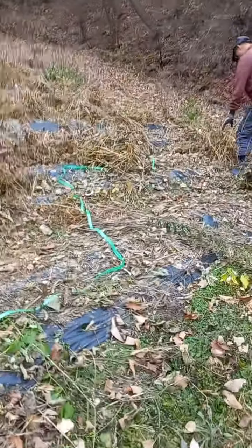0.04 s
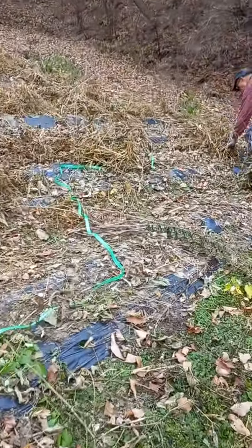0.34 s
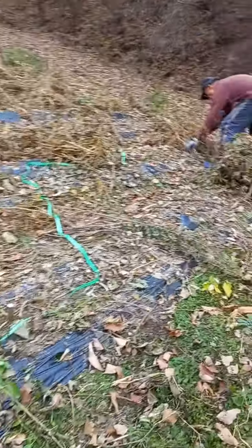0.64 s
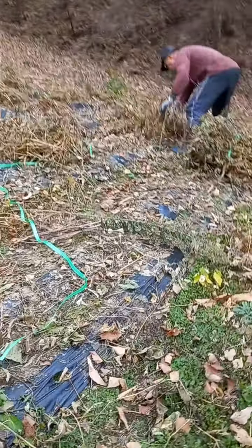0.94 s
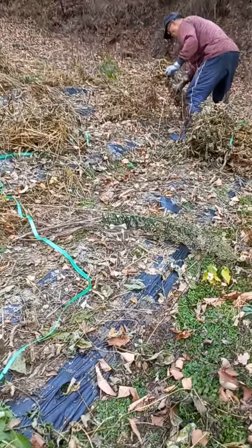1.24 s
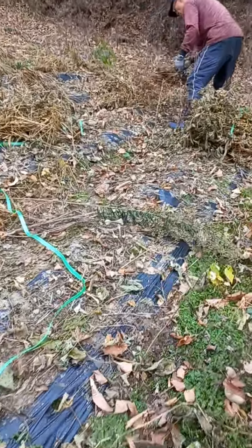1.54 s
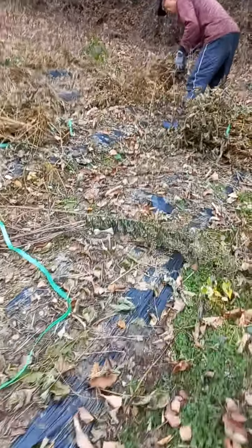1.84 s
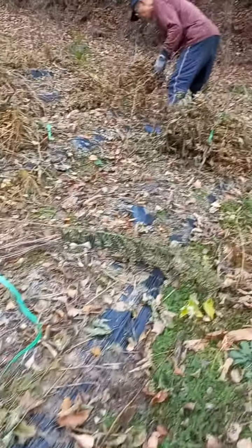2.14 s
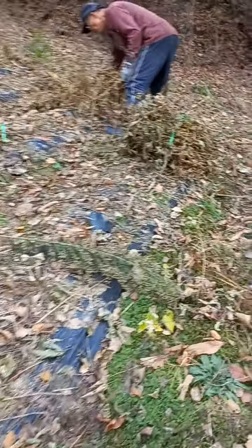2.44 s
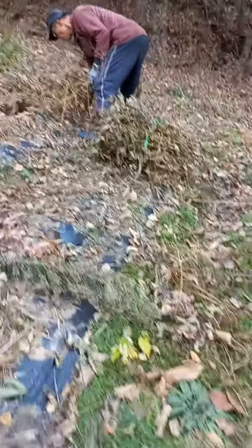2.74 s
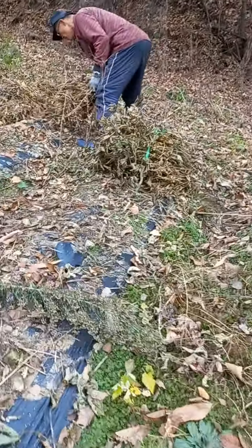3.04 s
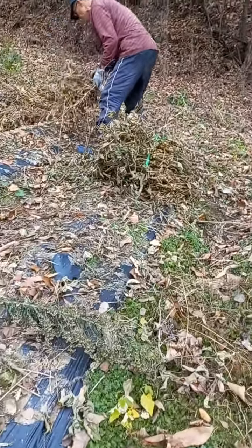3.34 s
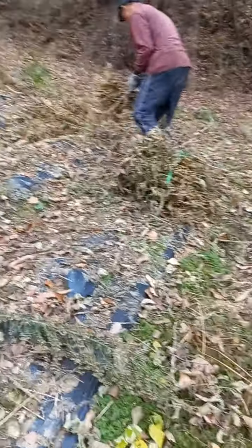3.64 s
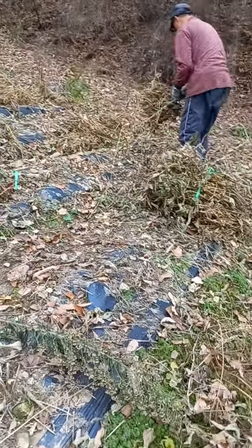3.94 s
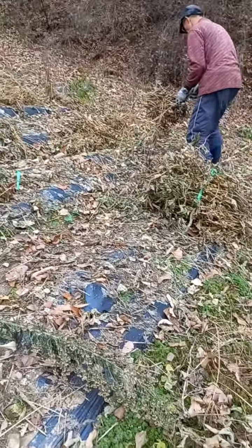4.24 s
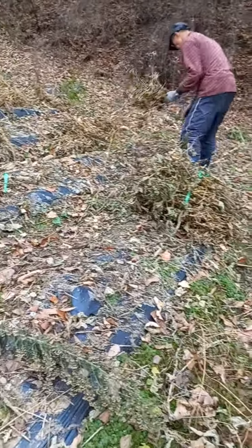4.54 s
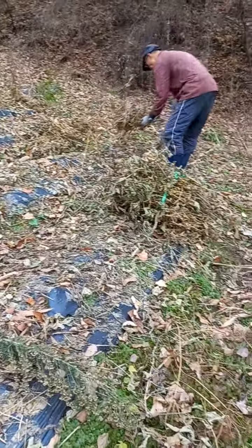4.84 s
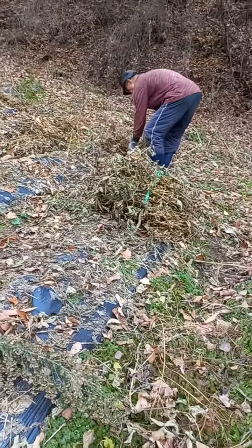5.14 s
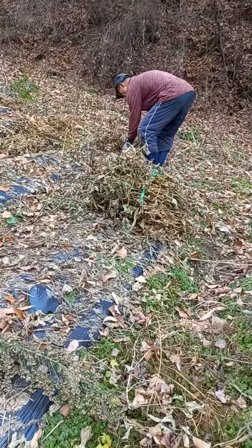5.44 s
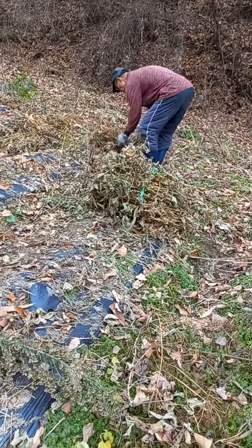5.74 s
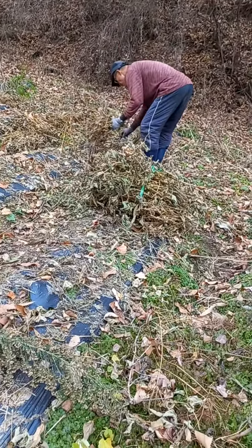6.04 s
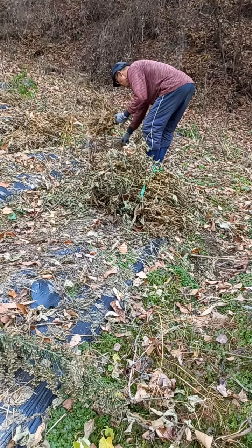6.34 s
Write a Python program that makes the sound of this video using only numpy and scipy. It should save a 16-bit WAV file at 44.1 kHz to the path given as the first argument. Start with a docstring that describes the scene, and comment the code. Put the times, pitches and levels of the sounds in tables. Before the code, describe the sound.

Slow steps crackle through dry leaves and twigs nearby, with swells of papery rustling from stalks being gathered further off.

```python
"""Gathering dry bean stalks

Stalks are gathered by hand a few metres away in an open field: swells of fine, papery crackle.
Close below the phone, slow steps crush leaf litter, snap twigs, pop hollow stems and thud on soft soil.
A sleeve brushes now and then; two microphone ports hear each source with their own lag and colour."""
import sys
import numpy as np
from scipy import signal
from scipy.fft import rfft, irfft, next_fast_len
from scipy.io import wavfile
from scipy.ndimage import uniform_filter1d

SR = 44100
rng = np.random.default_rng(int(sys.argv[2]) if len(sys.argv) > 2 else 0)


def waveform_to_disk(signal):
    """Save audio, clipped to [-1, 1], as 16-bit WAV at the path in sys.argv[1]."""
    frames = np.transpose(np.atleast_2d(signal))
    scaled = np.clip(frames, -1, 1) * 32767
    samples = np.round(scaled).astype(np.int16)
    wavfile.write(sys.argv[1], SR, samples)


N = 290619
TIME = np.arange(N) / SR


def undb(db):
    """Decibels to gain."""
    return 10 ** (np.asarray(db) / 20)


def unit(x):
    """Scale to rms 1."""
    return x / np.sqrt(np.mean(x ** 2))


def colour(x, points):
    """Minimum-phase filter through (freq_hz, gain_db) points."""
    hz, db = np.transpose(points)
    grid_hz = np.maximum(np.fft.rfftfreq(4096, 1 / SR), 1)
    gain = undb(np.interp(np.log(grid_hz), np.log(hz), db))
    cepstrum = irfft(np.log(gain))
    half = len(cepstrum) // 2
    cepstrum[1:half] *= 2
    cepstrum[half + 1:] = 0
    response = irfft(np.exp(rfft(cepstrum)))
    return signal.fftconvolve(x, np.atleast_2d(response), axes=-1)[:, :x.shape[-1]]


def ports(x, lead_ms):
    """One sound at two ports; the left hears it lead_ms earlier."""
    size = next_fast_len(len(x) + 128)
    phase = np.pi * np.fft.rfftfreq(size, 1 / SR) * lead_ms / 1000
    return irfft(rfft(x, size) * np.exp(1j * np.array([phase, -phase])), size)[:, :len(x)]


def pan(db):
    """Port gains for a left minus right level."""
    return undb(np.array([[.5], [-.5]]) * db)


def add(out, start_s, sound):
    """Mix in a short stereo sound."""
    start = max(int(start_s * SR), 0)
    out[:, start:start + sound.shape[1]] += sound[:, :N - start]


def wander(step_s, size=N):
    """Random levels step_s apart, joined by straight lines."""
    levels = rng.standard_normal(4096)
    return np.interp(TIME[:size] / step_s, np.arange(len(levels)), levels)


def swell(start_s, hold_s, db, rise_db_per_s, fall_db_per_s):
    """Gain of one movement: reaches its level at start_s, holds, dies away."""
    early_s = np.maximum(start_s - TIME, 0)
    late_s = np.maximum(TIME - start_s - hold_s, 0)
    return undb(np.maximum(db - rise_db_per_s * early_s - fall_db_per_s * late_s, -200))


def together(gains):
    """Unrelated rustles add in power."""
    return np.sqrt(sum(gain ** 2 for gain in gains))


def scatter(x, t60_s, wet_db):
    """Ground and plants throw back a short tail, unrelated at the two ports."""
    t = TIME[:min(SR // 8, x.shape[1])]
    tail = rng.standard_normal((2, len(t))) * np.exp(-np.log(1000) * t / t60_s)
    tail /= np.sqrt(np.sum(tail ** 2, axis=1, keepdims=True))
    return x + undb(wet_db) * signal.fftconvolve(x, tail, axes=-1)[:, :x.shape[1]]


def shade(x):
    """The phone's body dulls the left port for sounds from below."""
    left = colour(x[:1], [(1500, 0), (4000, 3), (7000, -7.5), (11000, -.5), (15000, -5)])
    return np.vstack([left, x[1:]])


def crackle(rate_per_s, spread_db, clump_db, lead_ms, width_ms, wet_db, families=14):
    """Tiny fractures in clumps; each leaf family has a pitch, and a path that shifts as plants move."""
    ring_s, share_db, path_s = .00025, 2.3, .55
    clumps_db = clump_db * wander(step_s=.012)
    out, t, path_samples = np.zeros((2, N)), TIME[:SR // 40], int(path_s * SR)
    for hz in np.linspace(900, 15500, families):
        breaks = np.flatnonzero(rng.random(N) < rate_per_s / families / SR)
        size_db = spread_db * np.minimum(rng.exponential(size=N)[breaks], 4.5)
        family_db = share_db * wander(step_s=.07)[breaks]
        polarity = np.sign(rng.random(N)[breaks] - .5)
        clicks = np.zeros((1, N))
        clicks[0, breaks] = undb(size_db + clumps_db[breaks] + family_db) * polarity
        leaf = np.exp(-t / ring_s) * np.cos(2 * np.pi * hz * t)
        leaf[0] += 1  # bare tick of the break
        direct = ports(np.roll(leaf, SR // 2000), lead_ms + width_ms * rng.uniform(-1, 1))
        for start in range(0, N, path_samples):
            path = scatter(direct, t60_s=.035, wet_db=wet_db)
            add(out, start / SR, signal.fftconvolve(clicks[:, start:start + path_samples], path, axes=-1))
    return unit(out)


def knocks(rows, lead_ms):
    """Heavily damped blows: a few cycles that swell and die."""
    out, t = np.zeros((2, N)), TIME[:SR // 10]
    for start_s, hz, level_db, swell_s in rows:
        envelope = (t / swell_s) ** 2 * np.exp(-1.4 * t / swell_s)
        blow = envelope / envelope.max() * np.sin(2 * np.pi * hz * t)
        add(out, start_s, ports(blow * undb(level_db), lead_ms))
    return out


# open-air spectrum: freq_hz, gain_db
AIR_SPECTRUM = [(25, -27), (45, -25), (70, -0.5), (110, -2), (170, -3), (300, -4), (750, -15), (1100, -23),
                (2000, -40.5), (6000, -17.5), (16000, -26.5)]


def air(level_db=-70):
    """Faint open-air noise, part common to both ports, part separate."""
    common = colour(rng.standard_normal((1, N)), AIR_SPECTRUM)
    separate = colour(rng.standard_normal((2, N)), AIR_SPECTRUM)
    separate = colour(separate, [(100, 6), (400, -1), (1200, 13)])
    return unit(common + separate) * undb(level_db) * pan(3.8)


def handful(start_s, hold_s, db, rise_db_per_s=149.5):
    """Gain of a pull on the stalks, then of their faint rustle as they spring back."""
    pull = swell(start_s, hold_s, db, rise_db_per_s, fall_db_per_s=139)
    spring_back = swell(start_s, hold_s, db - 13.5, rise_db_per_s, fall_db_per_s=20)
    return np.maximum(pull, spring_back)


# dry stalk spectrum; bending round the phone to the right port: freq_hz, gain_db
STALK_SPECTRUM = [(100, -13.5), (350, -12), (770, -7.5), (1050, -16), (1350, -10.5), (1750, -7.5),
                  (2300, -3.5), (3200, -4), (4000, 0), (5000, 0.5), (7200, 2.5), (8500, -3.5), (12000, -2),
                  (16000, -4.5)]
RIGHT_DIFFRACTION = [(800, 0), (1300, -3), (1850, -5.5), (2400, 2.5), (2850, -3), (3500, -0.5),
                     (4400, -1.5), (5800, 1.5), (6500, 2.5), (7500, -0.5), (16000, 0)]
# handfuls pulled into the bundle: start_s, hold_s, level_db, pan_db, sheen_db
HANDFULS = [(0, .01, -68, -7, 1), (0.092, 0.14, -64, -5.5, -1.5), (0.45, 0.19, -59.5, -2.5, 3),
            (0.655, 0.32, -50.5, -2, 2.5), (1.011, 0.084, -45, 4.5, 0), (1.142, 0.085, -54.5, 2, -2),
            (1.335, .02, -55.5, 0, -3), (2.035, 0.075, -56, 2.5, 0), (2.264, 0.051, -56.5, 1.5, -5),
            (2.412, 0.029, -54, -2.5, 1), (2.568, 0.081, -55, -3, -1.5), (2.811, 0.04, -42, 3, 1.5),
            (3.123, 0.027, -52, 2, 1.5), (3.292, .05, -57, 1, 0), (3.433, 0.033, -46.5, 3, 2.5),
            (3.592, 0.21, -53, -0.5, 3.5), (3.977, 0.035, -48, 0, -1.5), (4.174, 0.043, -45, 1.5, 1.5),
            (4.433, 0.11, -65, -1, -10), (4.59, 0.16, -58, 3, -1), (4.839, 0.037, -55.5, 3.5, 1),
            (5.086, 0.03, -51.5, 4, 0.5), (5.176, 0.05, -58.5, 4.5, -2), (5.46, 0.015, -66, 3, 5.5),
            (5.586, 0.13, -57.5, 4, -2), (5.75, 0.22, -54.5, 3, -0.5), (6.29, 0.026, -63, 3, 0.5),
            (6.435, 0.16, -62.5, 4, 2.5)]


def stalks(sheen_hz=8900):
    """Harder pulls break more leaves; leafy handfuls shine, single pods tick above the rustle."""
    stem_gain = together(handful(start_s, hold_s, db) * pan(pan_db)
                         for start_s, hold_s, db, pan_db, _ in HANDFULS)
    blade_gain = together(handful(start_s, hold_s, db + sheen_db) * pan(pan_db)
                          for start_s, hold_s, db, pan_db, sheen_db in HANDFULS)
    pull_db = 20 * np.log10(stem_gain.mean(axis=0))
    rate_per_s = 7500 * undb(.44 * (pull_db + 53.5))
    leaves = crackle(rate_per_s, spread_db=3, clump_db=1.8, lead_ms=.135, width_ms=.034, wet_db=1)
    leaves = unit(leaves / np.sqrt(rate_per_s))  # rate sets density only
    pods = crackle(rate_per_s=70, spread_db=1, clump_db=1, lead_ms=.135, width_ms=.044, wet_db=11)
    left, right = colour(leaves + undb(-14.5) * pods, STALK_SPECTRUM)
    rustle = unit(np.vstack([left, colour(right[None], RIGHT_DIFFRACTION)]))
    stems = signal.sosfiltfilt(signal.butter(3, sheen_hz, fs=SR, output="sos"), rustle)
    blades = rustle - stems
    return (stems * stem_gain + blades * blade_gain) * undb(1)


# reflection against direct sound: time_s, level_db
REFLECTION = [(2.5, -18), (3.0, -8.5), (6.5, -8.5)]


def bounce(x, lags_s=(.00178, .001)):
    """A near reflection ripples the timbre; it grows as the phone turns towards the bundle."""
    echo = np.array([np.roll(port, round(lag_s * SR)) for port, lag_s in zip(x, lags_s)])
    gain = undb(np.interp(TIME, *np.transpose(REFLECTION)))
    return (x + gain * echo) / np.hypot(1, gain)


def underfoot_grains():
    """Dense, even crackle under a shoe; it reaches the lower, right port first."""
    return crackle(rate_per_s=4000, spread_db=3, clump_db=.4, lead_ms=-.47, width_ms=.017, wet_db=-5)


# spectra of crisp leaves and the damp layer beneath: freq_hz, gain_db
CRISP_SPECTRUM = [(80, -13), (250, -9.5), (700, -14.5), (1000, -14), (1400, -5.5), (2100, -2.5), (3500, -3),
                  (5800, 3.5), (7200, 3), (8500, -1.5), (12000, -1.5), (16000, -2.5)]
DAMP_SPECTRUM = [(80, -15), (300, -8.5), (650, 1.5), (1300, 3.5), (2500, -2.5), (5000, -39)]
# shoe bearing down on litter: start_s, hold_s, crisp_db, damp_db
TREADS = [(0, 0.026, -54, -59.5), (0.295, 0.0083, -53, -55.5), (0.603, 0.54, -53.5, -66.5),
          (1.392, 0.036, -33.5, -58.5), (1.439, 0.015, -30.5, -55), (1.506, 0.017, -39.5, -50),
          (1.546, 0.04, -39, -57), (1.598, 0.04, -34, -52), (1.679, 0.16, -47.5, -71),
          (1.896, 0.072, -50, -91), (2.109, 0.021, -49.5, -63.5), (2.69, 0.077, -49, -55),
          (2.797, 0.079, -61, -55), (2.932, .1, -48.5, -60), (3.437, 0.17, -59, -63),
          (3.582, 0.11, -51, -57), (3.742, 0.041, -71, -53.5)]


def litter():
    """A shoe crushes crisp leaves and presses the damp layer beneath."""
    slopes = dict(rise_db_per_s=689, fall_db_per_s=278)
    crisp = crackle(rate_per_s=4000, spread_db=3, clump_db=1.9, lead_ms=-.444, width_ms=.062, wet_db=-6.5)
    crisp = unit(colour(crisp, CRISP_SPECTRUM))
    damp = unit(colour(underfoot_grains(), DAMP_SPECTRUM))
    crisp_gain = together(swell(start_s, hold_s, db, **slopes) for start_s, hold_s, db, _ in TREADS)
    damp_gain = together(swell(start_s, hold_s, db, **slopes) for start_s, hold_s, _, db in TREADS)
    return shade(crisp * crisp_gain + damp * damp_gain)


# dry fracture spectrum, leaves and twigs alike: freq_hz, gain_db
FRACTURE_SPECTRUM = [(300, -18), (1500, -12.5), (3500, -12.5), (6500, 3), (8500, -2), (12000, -0.5),
                     (16000, 1)]
# weight shifts on trodden leaves: start_s, hold_s, level_db
WEIGHT_SHIFTS = [(0, 0.057, -60), (0.634, 0.26, -50.5), (1.655, 0.28, -52.5), (3.38, 0.42, -53.5)]


def settling():
    """Trodden leaves give lone, crisp ticks as the weight shifts."""
    splits = crackle(rate_per_s=150, spread_db=-2, clump_db=-1, lead_ms=-.462, width_ms=.0081, wet_db=-2.5)
    weight = together(swell(*row, rise_db_per_s=62, fall_db_per_s=24) for row in WEIGHT_SHIFTS)
    return shade(unit(colour(splits, FRACTURE_SPECTRUM))) * weight * pan(3.8)


# brittle leaves splitting: start_s, pitch_hz, level_db
LEAF_TICKS = [(.0125, 8500, -40), (.2705, 10000, -45), (.533, 10000, -36), (.5605, 10500, -38),
              (.5843, 9600, -31.5), (.6575, 11000, -27), (.6604, 11100, -25), (.663, 11500, -24),
              (.7025, 11800, -21), (.7688, 10500, -31), (.8147, 10400, -29), (.8415, 10700, -26),
              (.8712, 11400, -24), (.8965, 11500, -25), (1.6955, 11800, -20), (1.7438, 10000, -32),
              (1.773, 10800, -29.5), (1.7925, 11000, -31), (2.006, 8000, -34), (2.0465, 10500, -30),
              (2.4355, 11000, -35), (2.506, 10500, -42), (2.5106, 10000, -30), (2.638, 11500, -27),
              (2.8845, 11000, -30), (3.072, 8000, -38), (3.5275, 11000, -32), (3.6805, 10500, -30),
              (3.7058, 10500, -33), (3.8428, 10500, -38)]


def leaf_ticks(swell_s=.00005):
    """A brittle leaf splits in a fraction of a millisecond, close below the right port."""
    splits = knocks([(*row, swell_s) for row in LEAF_TICKS], lead_ms=-.44)
    return scatter(splits * pan(-13), t60_s=.012, wet_db=-1)


# twigs and pods breaking: start_s, level_db, t60_s, woody_db, pan_db, treble_db
TWIG_SNAPS = [(.1172, -31.5, 0.0053, -23, -10, 3.5), (0.6206, -31, .009, -33, -14, -1),
              (0.6372, -27.5, .011, -44, -12.5, 0), (0.9296, -27, .007, -17, -6, -2),
              (1.3531, -16, .02, -9.5, 0, -6.5), (1.358, -24, .022, -16, 2, -9),
              (1.386, -28, .05, -14, -4, -7), (1.3895, -23, .05, -16, -2, -8),
              (1.4414, -10, .014, -15, -4, -12), (1.4448, -18.5, 0.013, -24, -6, -8),
              (1.4479, -17, .02, -20, -3, -14), (1.4526, -21, .05, -12, -6, -8),
              (1.514, -20, .014, -17, -1, 1.5), (1.5488, -24, .007, -22, 0, 2),
              (1.6488, -15.5, .007, -34, -5, -1), (1.7216, -27, .007, -27, -5, 0),
              (1.8272, -28.5, .01, 0, -2, -3), (2.2207, -42.5, .012, -5, 1, -3),
              (2.2885, -38.5, 0.058, -16, -2, -1), (2.356, -37.5, .013, -17, -5, -4.5),
              (2.535, -34, .008, -35, -11, -3), (2.5611, -30.5, .009, -29, -15, 7),
              (2.577, -37.5, .02, -22, -5, -4), (2.6776, -31.5, .014, -9, 3, -2),
              (2.6798, -28.5, .007, -23, -8, 2), (2.7, -25.5, .007, 17, 6, 2),
              (2.8734, -31.5, .01, -29, -12, -1), (2.927, -33, .011, 6, -3, -2),
              (3.561, -32, .04, -30, 3, 0), (3.939, -37, .02, -26, 2, -4), (4.1437, -31, 0.018, -21, 6, -3),
              (4.154, -33.5, .011, -23, 2, 0), (4.2385, -32, 0.011, -36, -3, -1),
              (4.382, -43.5, .02, -42, -4, -2), (4.6918, -35.5, .02, -36, 4, 0),
              (5.034, -40, .019, -47, 0, -1), (5.465, -50, .014, -31, 7, -8),
              (5.5135, -42, 0.029, -38, -1, 0), (5.5315, -44, .03, -35, 3, 0),
              (5.5435, -48, .016, -35, 4, 0), (5.571, -47, 0.11, -22, 4, -7), (5.754, -41, .03, -20, 7, -3),
              (5.945, -39, 0.033, -22, 5, -5), (6.538, -50, 0.037, -29, 4, -4)]


def twig_snaps(fibre_step_s=.00069, fibre_spread_db=2):
    """A sharp crack, then a quickly dying run of fibres giving way one after another."""
    out, t = np.zeros((2, N)), TIME[:SR // 12]
    for start_s, level_db, t60_s, woody_db, pan_db, treble_db in TWIG_SNAPS:
        jerks = undb(fibre_spread_db * wander(fibre_step_s, size=len(t)))
        tear = .25 * np.exp(-t / .0004) + jerks * np.exp(-np.log(1000) * t / t60_s)
        direct = ports(rng.standard_normal(len(t)) * tear, lead_ms=-.426)
        fibres = direct + .5 * rng.standard_normal((2, len(t))) * tear
        bright = colour(fibres, FRACTURE_SPECTRUM)
        woody = colour(fibres, [(500, -44), (1500, 4), (2400, 7.5), (4000, 7), (8000, 1.5)])
        crack = colour(bright + undb(woody_db + 5.5) * woody, [(12000, 0), (14500, treble_db)])
        whole_to_attack = np.sqrt(np.mean(tear ** 2) / np.mean(tear[:SR // 500] ** 2))
        add(out, start_s, unit(crack) * whole_to_attack * undb(level_db - 8) * pan(pan_db))
    return scatter(out, t60_s=.05, wet_db=-14)


# sleeve brushing: start_s, hold_s, level_db, pitch_hz
SLEEVE_STROKES = [(0.12, 0.046, -62, 1410), (0.177, 0.011, -57, 1360), (0.227, 0.011, -57, 1420),
                  (4.635, 0.08, -69, 715), (4.648, .004, -64, 630), (4.74, 0.015, -59.5, 770),
                  (4.778, 0.01, -56, 790), (4.822, 0.057, -57, 720), (4.897, 0.021, -67, 730)]


def sleeve(slips_per_s=800):
    """Cloth catches and slips: a dull, grainy scuff, each stroke with its own pitch."""
    slips = rng.standard_normal(N) * (rng.random(N) < slips_per_s / SR)
    fuzz = ports(slips, lead_ms=.16) + .14 * rng.standard_normal((2, N))
    out = np.zeros((2, N))
    for start_s, hold_s, db, hz in SLEEVE_STROKES:
        rasp = [(120, -20), (240, -14), (.66 * hz, -14), (hz, 3), (1.24 * hz, -9),
                (2 * hz, -5), (2 * hz, -14), (4000, -18), (10000, -28)]
        stroke = swell(start_s, hold_s, db, rise_db_per_s=798, fall_db_per_s=796)
        out += unit(colour(fuzz, rasp)) * stroke
    return out * undb(.5) * pan(3.4)


# shoes landing on soil: start_s, pitch_hz, level_db, swell_s
SOIL_THUDS = [(.174, 297, -57, 0.0023), (.273, 342, -48.5, 0.0055), (.292, 216, -53, 0.0059),
              (.317, 109, -47.5, 0.0065), (.574, 111, -51.5, 0.0088), (1.47, 219, -34, 0.0009),
              (1.477, 110, -34, 0.0029), (1.515, 275, -46, 0.0019), (2.352, 128, -57, 0.0027)]


def soil_thuds():
    """Soft soil thuds under a step; crumbling earth roughens each thud."""
    thuds = knocks(SOIL_THUDS, lead_ms=-.45)
    load = uniform_filter1d(np.abs(thuds[1]), SR // 80)
    noise = ports(rng.standard_normal(N), lead_ms=-.44)
    crumbs = colour(noise, [(60, -27), (130, -7), (240, -5), (500, -21), (1200, -18), (4000, -34)])
    return thuds + undb(-1.5) * load * unit(crumbs)


# hollow stems bursting: start_s, pitch_hz, level_db, swell_s
STEM_POPS = [(2.572, 850, -37.5, 0.0006), (2.7268, 1190, -17, 0.0005), (3.332, 1500, -42, 0.00028),
             (3.5374, 1230, -28, 0.00055)]


def stem_pops():
    """Hollow stems pop under the weight of a step."""
    pops = knocks(STEM_POPS, lead_ms=-.47)
    pops = colour(pops, [(60, -9.5), (300, -6), (800, -2), (1500, .5), (3000, -1)])
    return scatter(pops, t60_s=.083, wet_db=-17)


# scraping stem spectrum: freq_hz, gain_db
DRAG_SPECTRUM = [(300, -25), (1200, 0.5), (2000, 4), (2700, 7.5), (3400, -7), (6000, -27), (14000, -23)]
# stem against a shoe: start_s, hold_s, level_db
STEM_DRAGS = [(3.601, 0.027, -47)]


def stem_drag():
    """A stem scrapes briefly along the edge of a shoe."""
    gain = together(swell(*row, rise_db_per_s=750, fall_db_per_s=378) for row in STEM_DRAGS)
    return shade(unit(colour(underfoot_grains(), DRAG_SPECTRUM)) * gain)


def scene():
    """Open air and stalks further off; steps and sleeve close by."""
    distant = air() + bounce(stalks())
    close = litter() + settling() + leaf_ticks() + twig_snaps() + sleeve()
    return distant + close + soil_thuds() + stem_pops() + stem_drag()


# right port response, rippled by the phone's body: freq_hz, gain_db
RIGHT_PORT_RESPONSE = [(100, -0.5), (400, 0), (700, 2), (1150, -0.5), (1700, 1.5), (2400, 2.5), (3000, 1),
                       (4200, -1), (5600, 1), (7000, 2), (9000, 4.5), (10200, 7), (11300, 11), (13000, 3.5),
                       (15000, -1)]


def record(dry):
    """The right port rings in the high treble; rumble and the very top are cut."""
    low_cut_hz, high_cut_hz = 62, 15900
    heard = np.vstack([dry[:1], colour(dry[1:], RIGHT_PORT_RESPONSE)])
    heard = signal.sosfilt(signal.butter(4, low_cut_hz, "high", fs=SR, output="sos"), heard)
    return signal.sosfilt(signal.ellip(10, .2, 70, high_cut_hz, fs=SR, output="sos"), heard)


dry = scene()
out = record(dry)
waveform_to_disk(out)
```